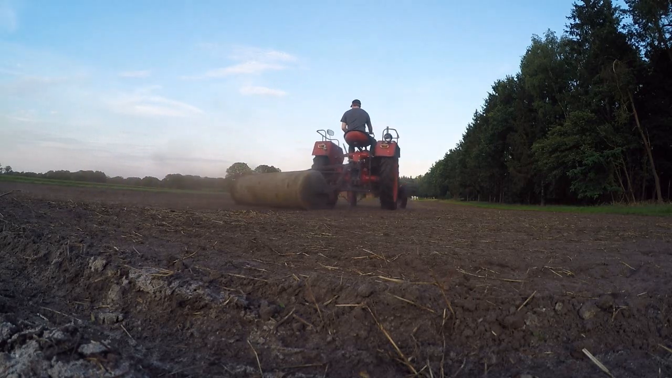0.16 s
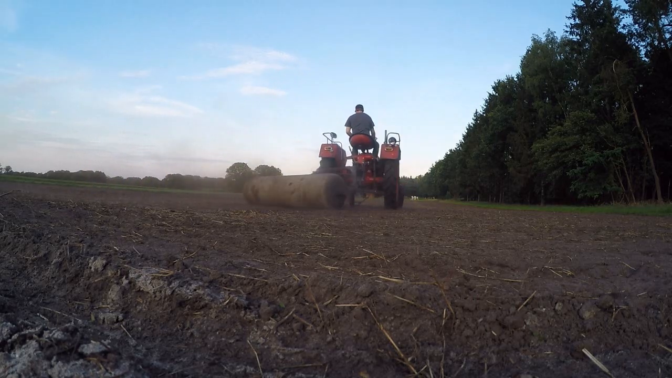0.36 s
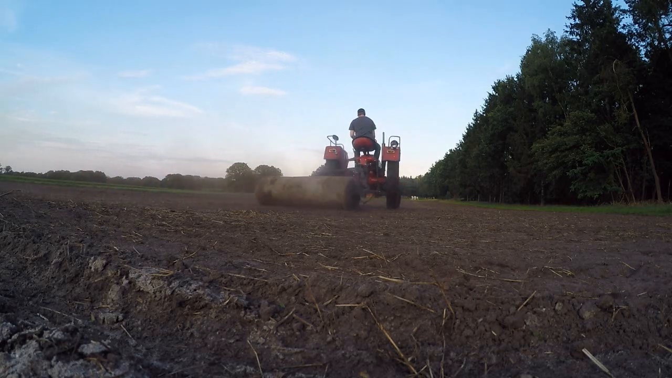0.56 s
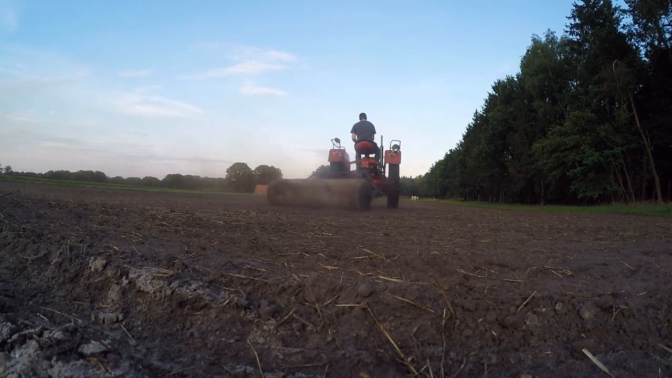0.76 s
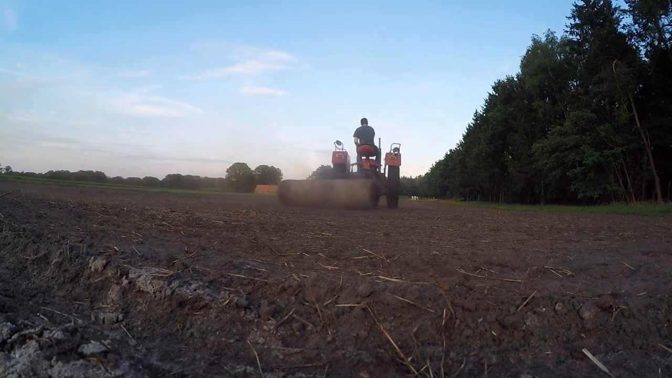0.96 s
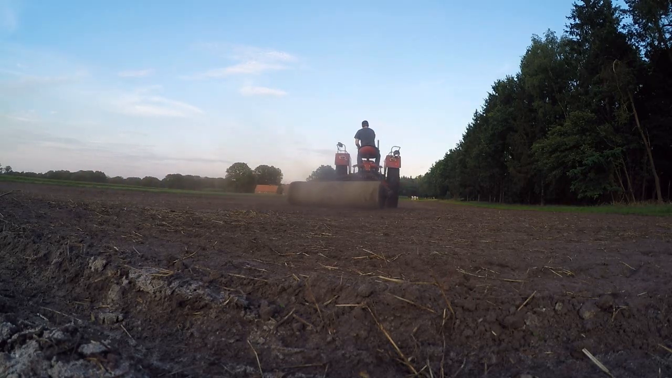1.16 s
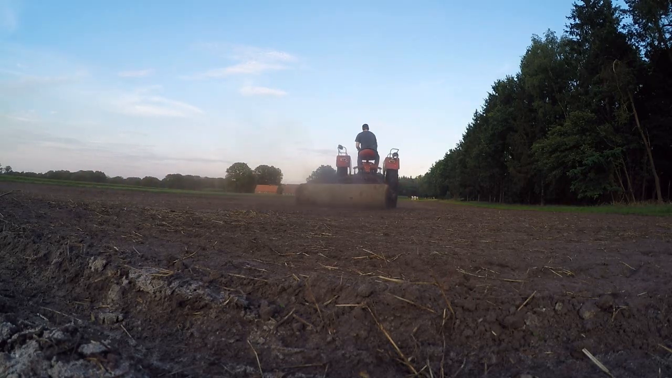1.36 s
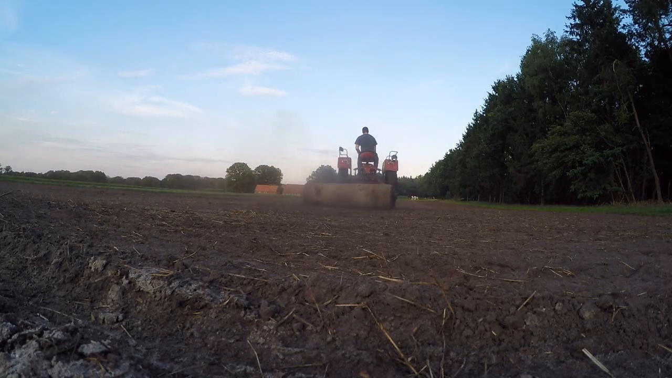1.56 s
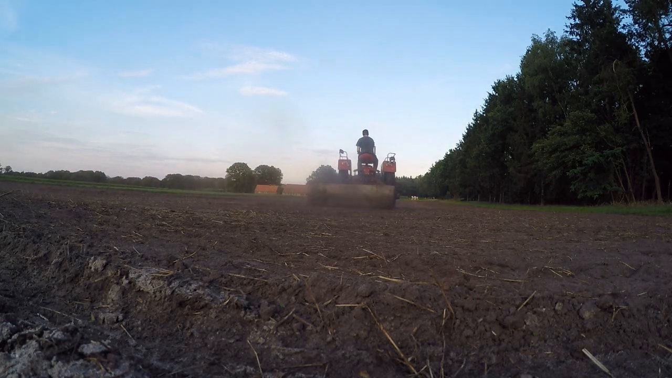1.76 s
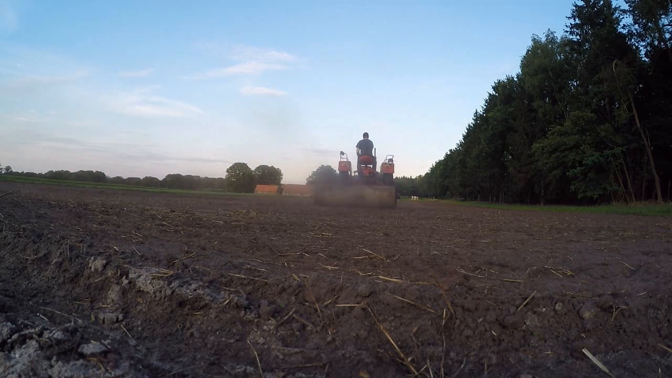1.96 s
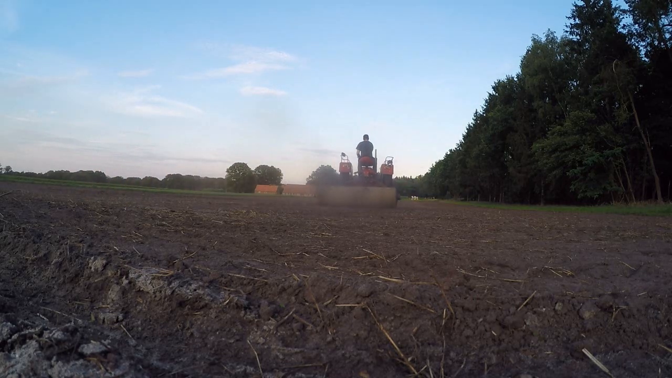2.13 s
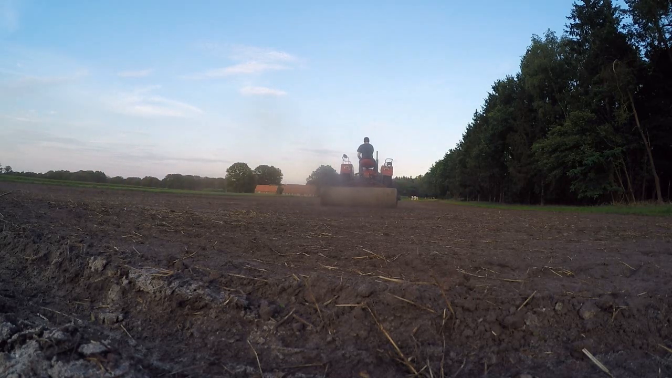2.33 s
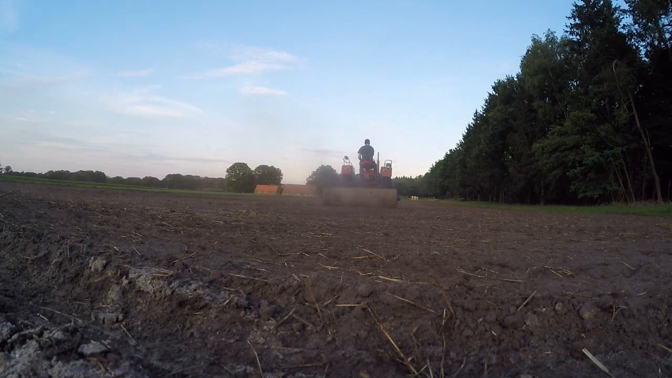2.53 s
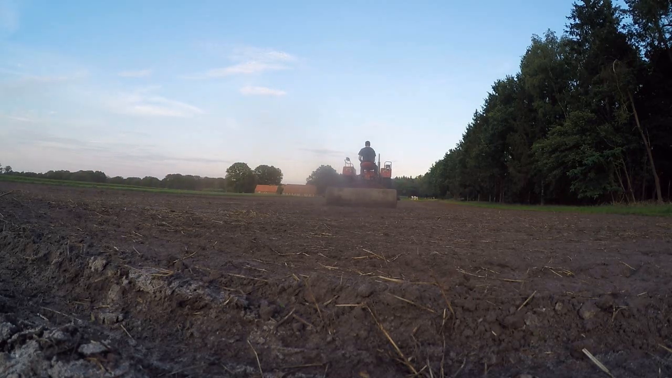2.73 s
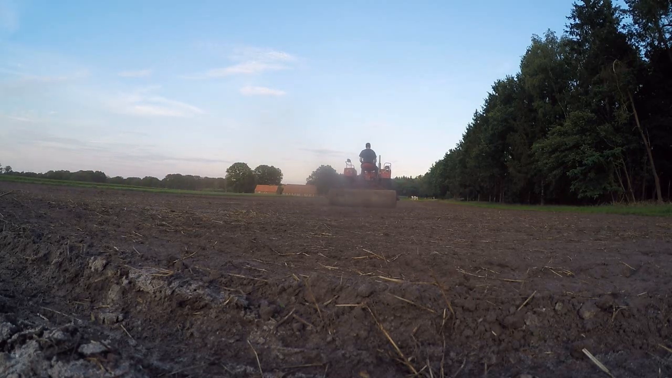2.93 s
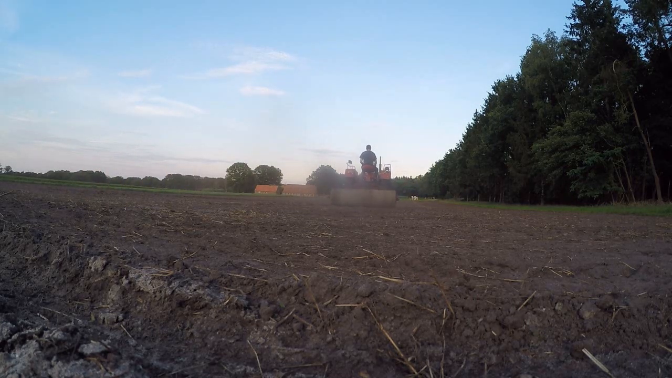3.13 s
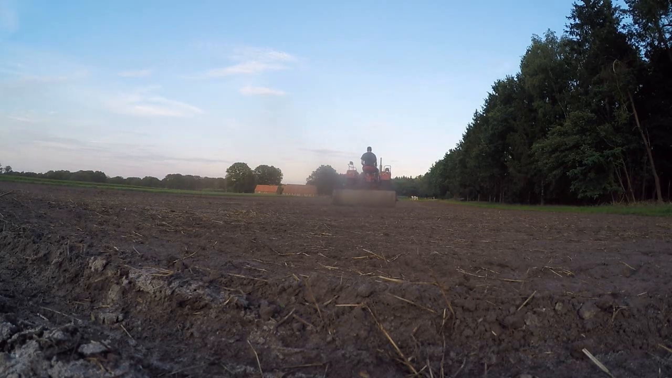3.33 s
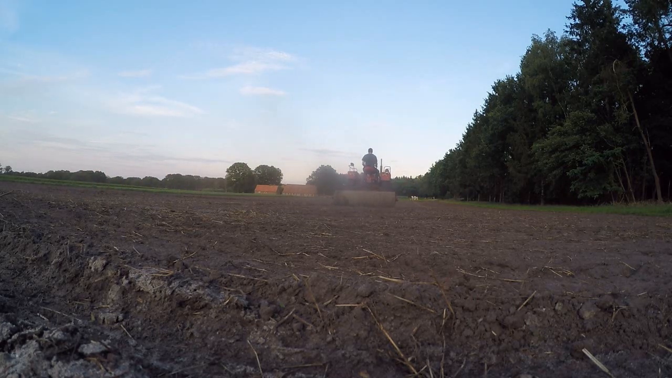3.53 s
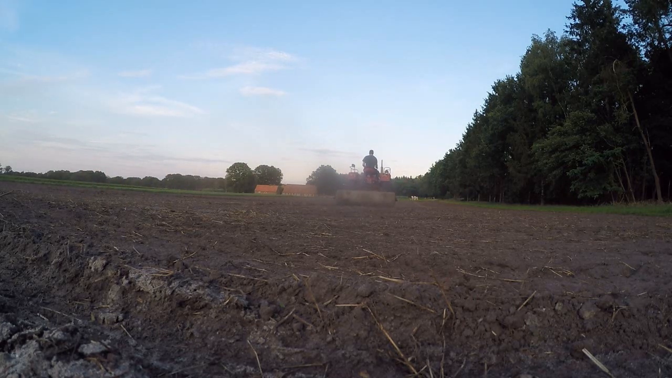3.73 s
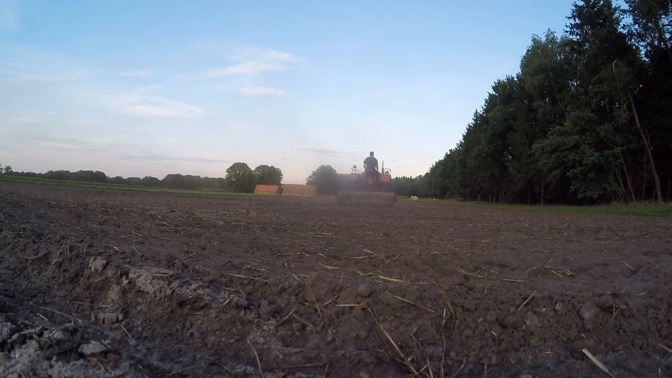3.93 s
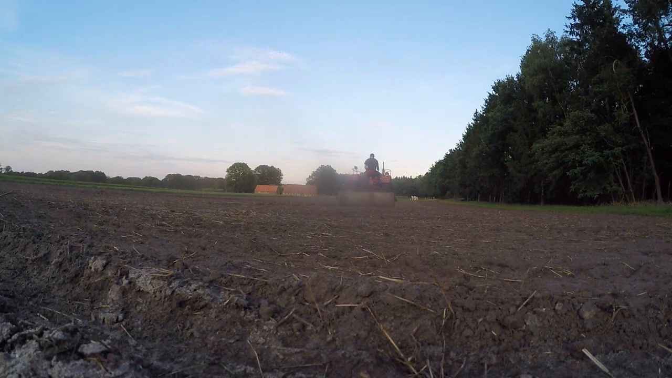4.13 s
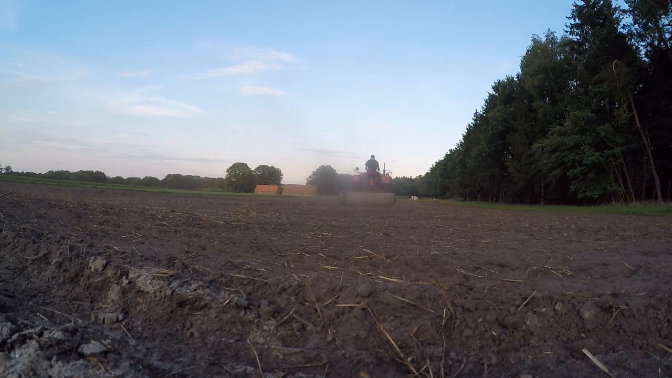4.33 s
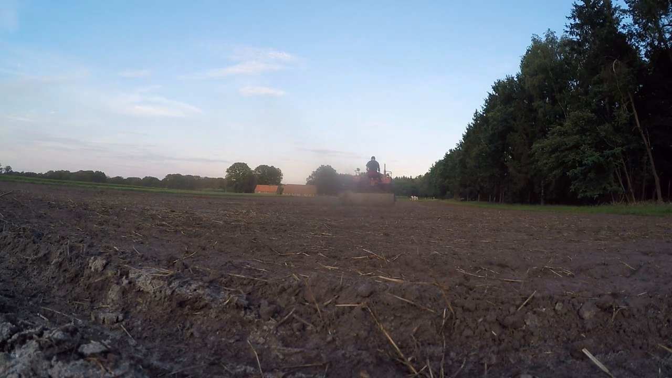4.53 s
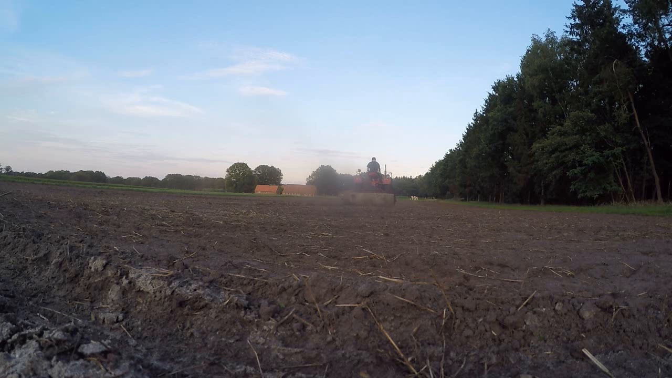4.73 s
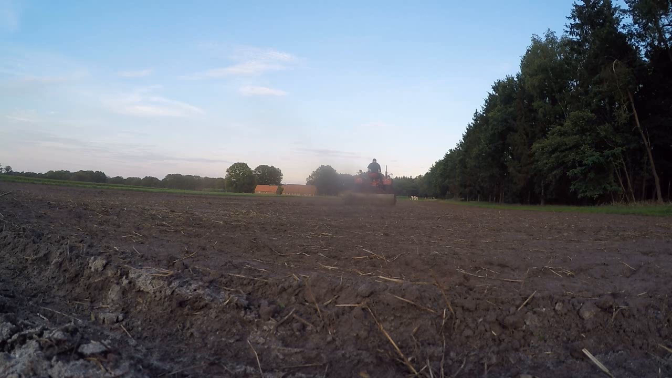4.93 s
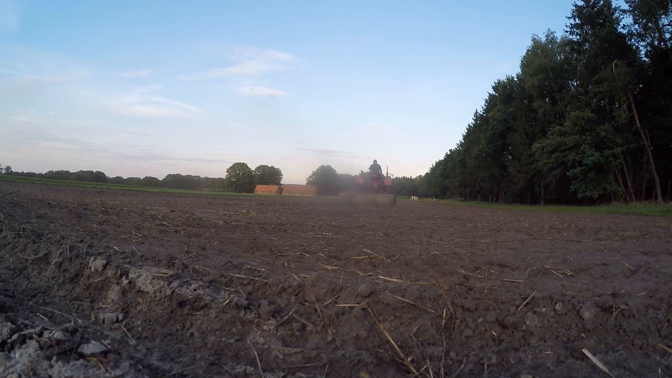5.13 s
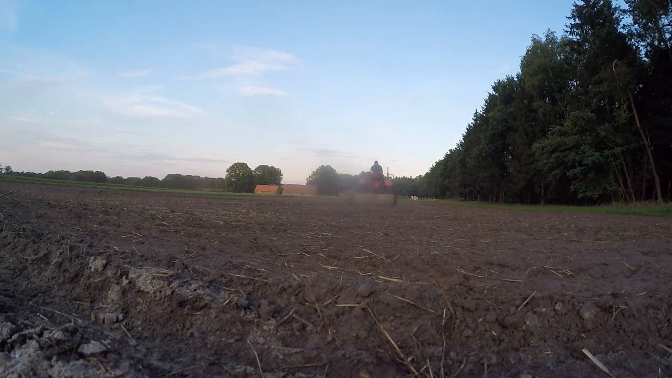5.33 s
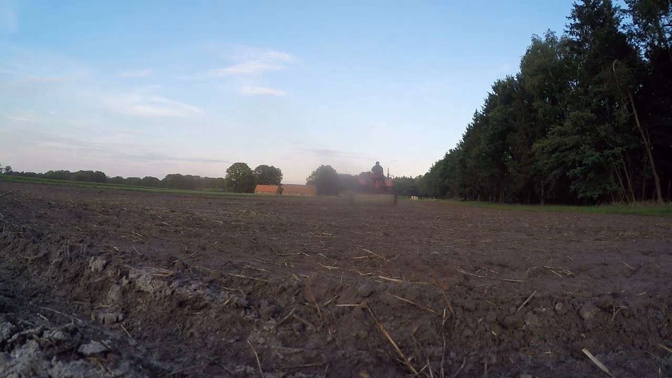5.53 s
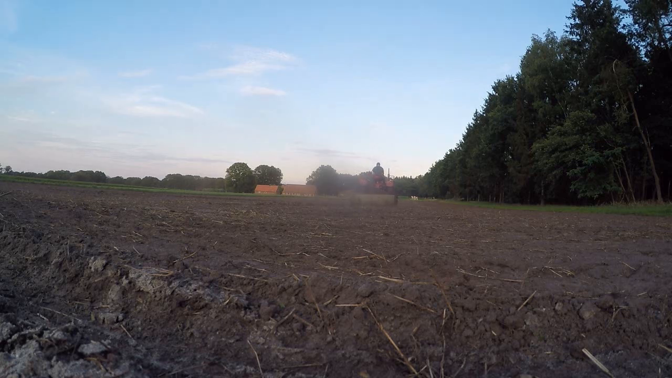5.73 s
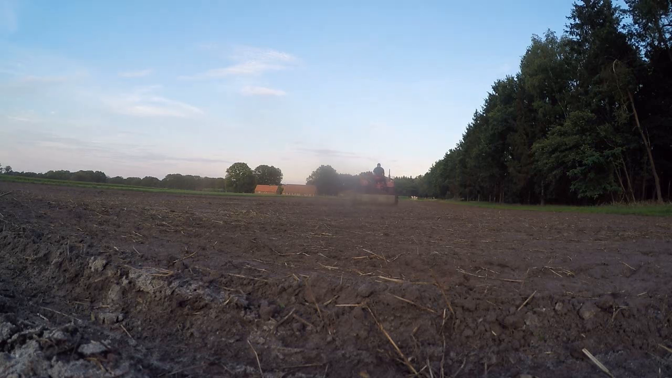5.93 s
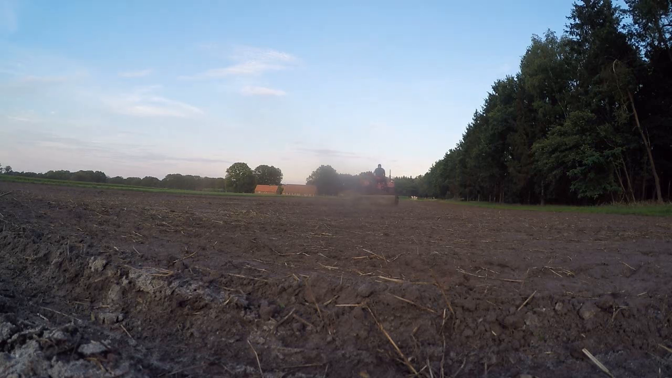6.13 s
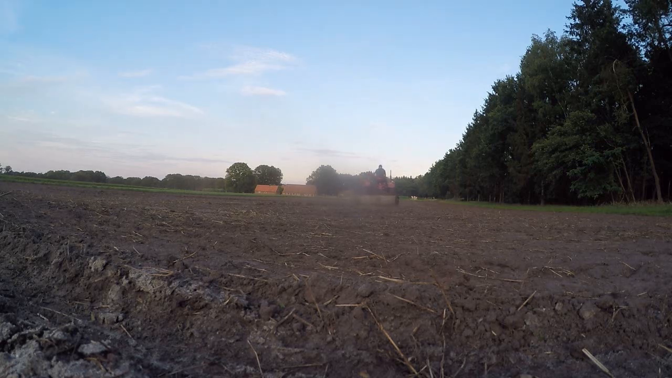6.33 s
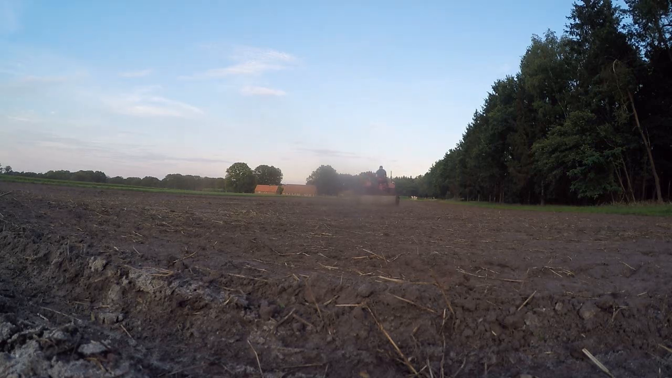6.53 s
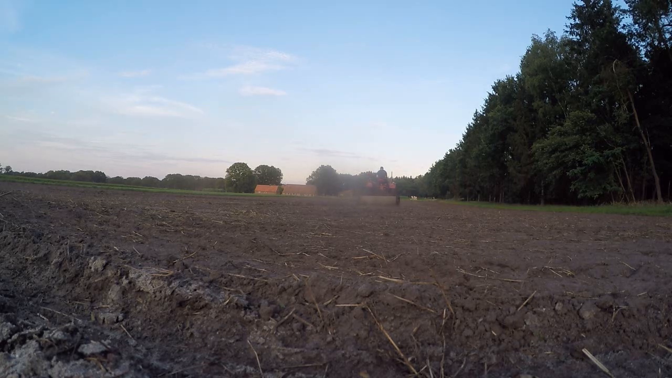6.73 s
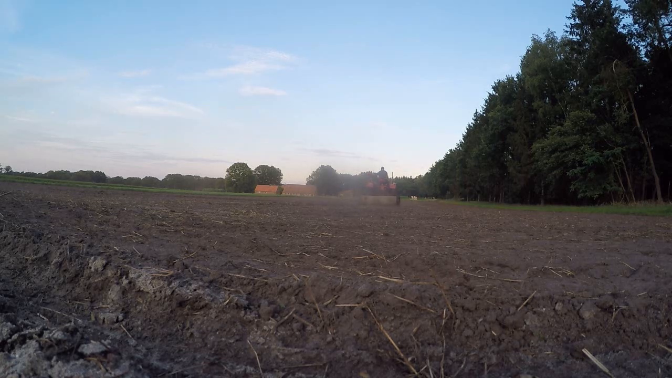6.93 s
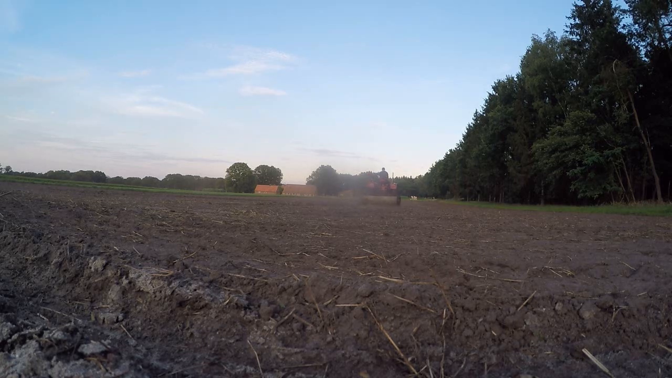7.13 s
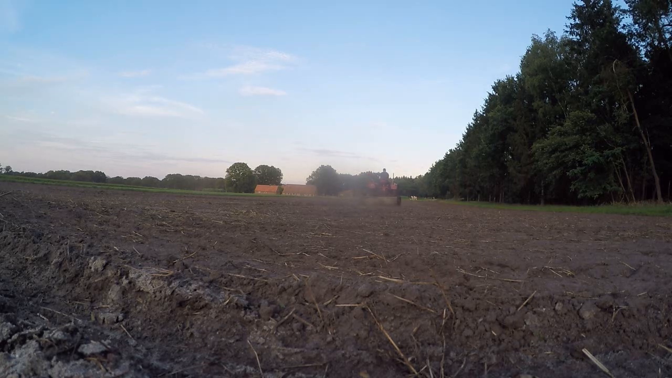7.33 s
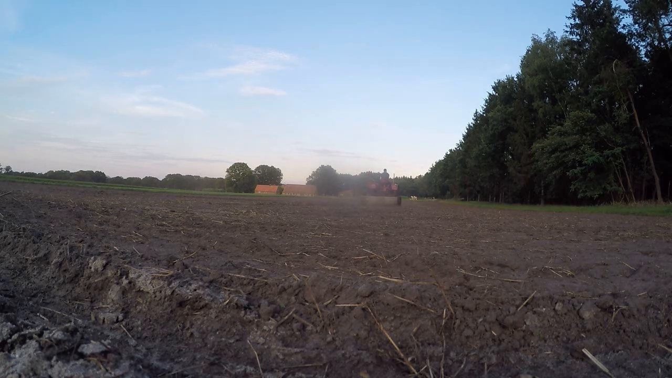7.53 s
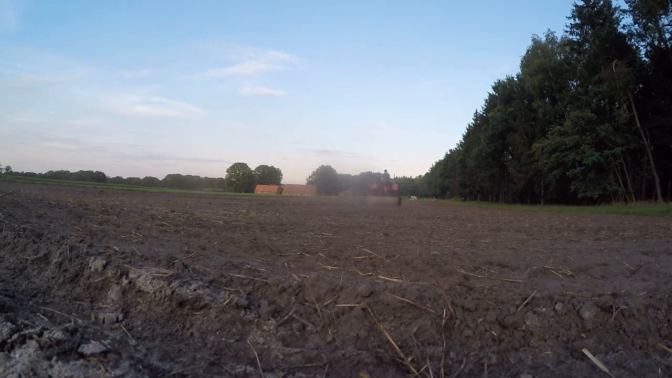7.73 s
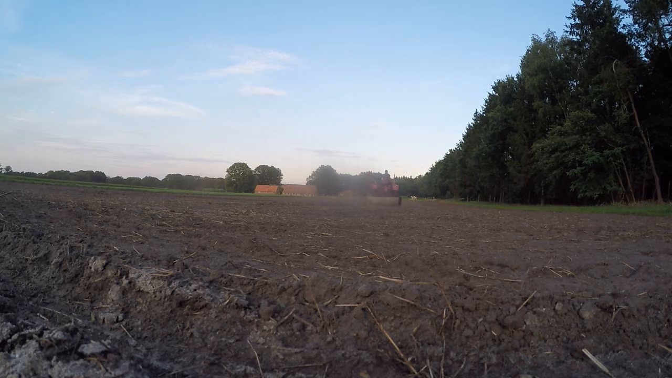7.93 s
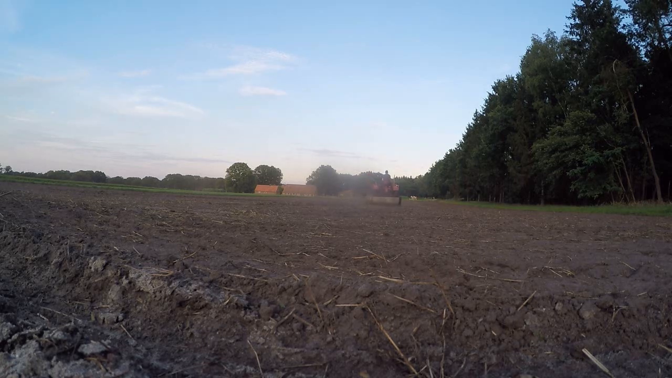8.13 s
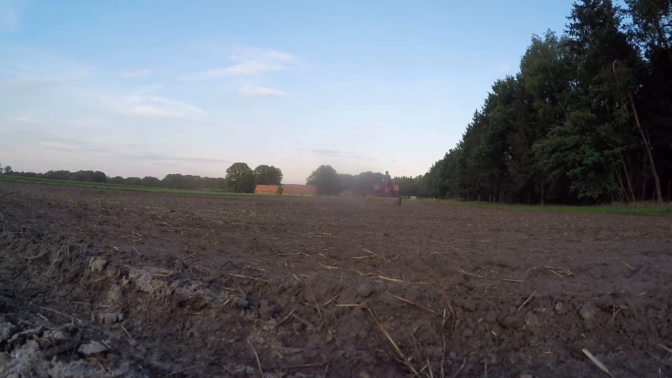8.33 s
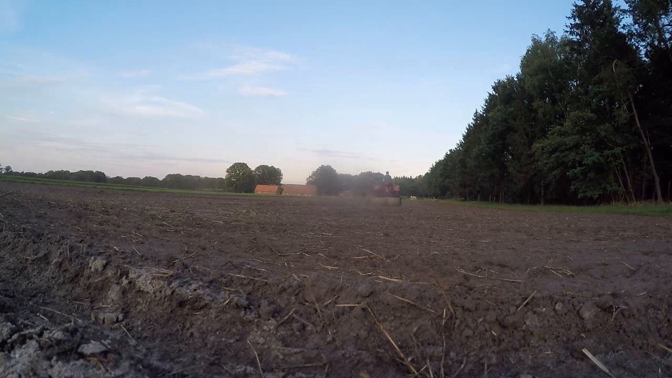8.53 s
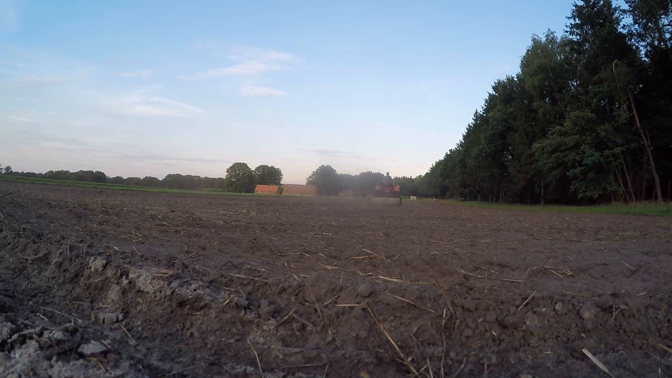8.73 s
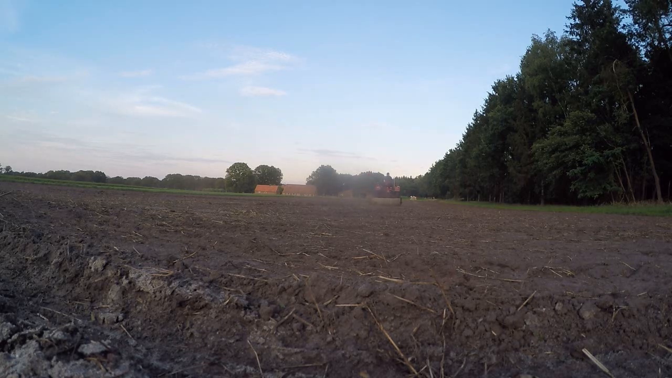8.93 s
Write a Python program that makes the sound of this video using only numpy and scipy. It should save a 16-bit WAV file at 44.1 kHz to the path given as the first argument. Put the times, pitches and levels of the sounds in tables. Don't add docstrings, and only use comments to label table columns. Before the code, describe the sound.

Outdoors at a field's edge, a fixed low microphone hears stubble and clods crunch close by at the start, then an old two-cylinder tractor driving away. Its deep, lopsided exhaust thumps run steadily under metallic clatter, valve hiss and knocking, with a roller rumbling behind. The engine dulls slightly as the roller swings past, then everything gradually gets quieter; a faint hitch squeak comes late.

```python
import sys
import numpy as np
from scipy import signal
from scipy.io import wavfile
from scipy.ndimage import uniform_filter1d

SR = 44100
rng = np.random.default_rng(int(sys.argv[2]) if len(sys.argv) > 2 else 0)


def put_to_file(sound):
    columns = np.atleast_2d(sound).T
    safe = np.clip(columns, -1, 1)
    whole_steps = np.round(safe * 32767)
    wavfile.write(sys.argv[1], SR, whole_steps.astype(np.int16))


def makeup_ratio(level_db):
    decades = np.asarray(level_db, float) / 20
    return 10 ** decades


N = 395577
RUN_IN = 24000
TIME = np.arange(-RUN_IN, N) / SR


def rms_one(x):
    return x / np.sqrt(np.mean(x ** 2) + 1e-20)


def curve(rows):
    s, value = np.transpose(rows)
    return np.interp(TIME, s, value)


def drift(rate):
    r = np.exp(-80 * np.pi * rate / SR)
    chance = rng.standard_normal(len(TIME) // 40 + 2002)
    slow = signal.lfilter([1], [1, -2 * r, r * r], chance)[2000:]
    return np.interp(np.arange(len(TIME)) / 40, np.arange(len(slow)), rms_one(slow))


def ring(x, hz, t60):
    r, w = makeup_ratio(-60 / (t60 * SR)), 2 * np.pi * hz / SR
    return signal.lfilter([0, np.sin(w)], [1, -2 * r * np.cos(w), r * r], x + 1e-18)


def resonant_noise(white, hz, t60):
    return rms_one(ring(ring(white, hz, t60), hz, t60))


def fade(x, t60):
    return signal.lfilter([1], [1, -makeup_ratio(-60 / (t60 * SR))], x + 1e-18)


def receding(start_db, spreading, db_per_10m):
    start_m, drive_m_per_s = 5.85, 4.22
    metres = start_m + drive_m_per_s * np.maximum(TIME, 0)
    return start_db - spreading * 20 * np.log10(metres / start_m) - db_per_10m * (metres - start_m) / 10


# (t/s, level/dB, f/Hz,
# width/Hz, t60/s)
JOLT_BURSTS = [
    (-.1, -62, 12600, 7000, 9.2),
    (.012, -28, 480, 600, 0.3),
    (.04, -27, 1200, 2400, 0.076),
    (.105, -34, 420, 400, .2),
    (.105, -36, 2000, 2000, .08),
    (1.402, -28.5, 2310, 3500, 0.13),
    (6.675, -55.5, 6530, 40, 0.5),
    (6.675, -60, 6940, 40, .4),
]


def jolts():
    out, white = 0, rng.standard_normal(len(TIME))
    for s, db, hz, width, t60 in JOLT_BURSTS:
        since = np.maximum(TIME - s, 0)
        rise = 1 - np.exp(-since / 0.0065)
        fall = makeup_ratio(-60 * np.minimum(since / t60, 3))
        out = out + makeup_ratio(db) * rise * fall * resonant_noise(white, hz, 2.2 / width)
    return out


# (t/s, four-stroke cycles per s)
ENGINE_SPEED = [(0, 11.375), (.5, 11.386), (1.6, 11.657), (2.1, 11.443), (2.9, 11.688), (4.4, 11.453),
                (4.7, 11.268), (6.1, 11.057), (6.7, 11.11), (7.0, 11.026), (8.3, 11.085), (8.6, 11.246),
                (8.97, 11.199)]


def each_cycle(share, spread_db, jitter_s):
    start_cycle = -.159
    turned = np.cumsum(curve(ENGINE_SPEED)[::64]) * 64 / SR
    cycles = start_cycle + turned - np.interp(0, TIME[::64], turned)
    chance = rng.standard_normal((110, 2))
    at = np.interp(np.arange(-5, 105) + share, cycles, TIME[::64], right=99)
    at = at + jitter_s * chance[:, 0]
    index = np.round(at * SR).astype(int) + RUN_IN
    inside = index < len(TIME)
    clicks = np.zeros(len(TIME))
    clicks[index[inside]] = makeup_ratio(spread_db * chance[inside, 1])
    return clicks


# (share of cycle, level/dB)
FIRING_STROKES = [
    (-.004, 0),
    (.236, -2.5),
]
# (f/Hz, level/dB, t60/s, polarity)
PIPE_MODES = [(39.3, -12.7, 0.35, -1), (57.4, 1.2, 0.052, 1), (62.7, -10.4, 0.139, -1),
              (86.8, -11.0, 0.122, -1), (114.3, -32.0, 0.5, -1), (170.8, -28.7, 0.099, 1)]
# (share of cycle, level/dB)
INTAKE_STROKES = [
    (.315, 0),
    (.829, .1),
]
# (f/Hz, level/dB, t60/s, polarity)
INTAKE_MODES = [(64.4, -36.6, 0.5, 1), (102.5, -34.8, 0.5, 1), (120.0, -33.9, 0.5, 1),
                (155.1, -53.7, 0.5, 1), (172.7, -29.7, 0.259, -1)]


def exhaust():
    puff_hz, mic_cut_hz = 164.6, 43.4
    boom = 0
    for strokes, modes in (FIRING_STROKES, PIPE_MODES), (INTAKE_STROKES, INTAKE_MODES):
        puffs = sum(makeup_ratio(db) * each_cycle(share, spread_db=.3, jitter_s=.00005) for share, db in strokes)
        for hz, db, t60, sign in modes:
            boom = boom + sign * makeup_ratio(db) * ring(puffs, hz, t60)
    r = np.exp(-2 * np.pi * puff_hz / SR)
    soft = signal.lfilter([1], [1, -2 * r, r * r], boom)
    return rms_one(signal.sosfilt(signal.butter(2, mic_cut_hz, "high", fs=SR, output="sos"), soft))


# (share of cycle, centre f/Hz, width/octaves, level over the clatter/dB, t60/s)
VALVE_EVENTS = [(0.805, 4930, 0.44, 6, 0.071), (0.858, 9200, 0.74, 7, 0.051),
                (0.065, 6150, 0.82, 7.5, 0.065), (0.31, 9500, 0.47, 3.5, 0.056),
                (0.544, 10800, 0.88, 9, 0.06), (0.283, 400, 0.84, -2.5, 0.064),
                (0.59, 3740, 0.19, 5, 0.057), (.1, 15000, .4, 1, .06), (0.83, 13700, 0.38, -1, 0.054),
                (0.25, 5600, 0.63, -3, 0.042), (.84, 1600, 0.51, 1, 0.054), (0.596, 2410, 0.19, 0, 0.064)]


def valve_puffs():
    puffs = []
    for share, _, _, db, t60 in VALVE_EVENTS:
        clicks = makeup_ratio(db) * each_cycle(share, spread_db=0.0, jitter_s=.001)
        puffs.append(uniform_filter1d(fade(clicks, t60), size=90))
    return puffs


def bands(spectrum, puffs, patchy_db):
    hz_points, db_points = np.transpose(spectrum)
    octaves = np.log2(hz_points[-1] / hz_points[0])
    edges = hz_points[0] * 2 ** np.arange(0, octaves + .3, 1 / 3)
    white, out = rng.standard_normal((2, len(TIME))), 0
    for k, (low, high) in enumerate(zip(edges, edges[1:])):
        hz = np.sqrt(low * high)
        swell = 1
        for puff, (_, centre, width, *_) in zip(puffs, VALVE_EVENTS):
            away = np.log2(hz / centre)
            if abs(away) < 2 * width:
                swell = swell + puff * np.exp(-(away / width) ** 2)
        band = signal.butter(2, [low, high], "band", fs=SR, output="sos")
        noise = signal.sosfilt(band, white[k % 2])
        level_db = np.interp(np.log(hz), np.log(hz_points), db_points) + patchy_db * drift(9.1)
        out = out + noise * swell * makeup_ratio(level_db)
    return rms_one(out)


# (f/Hz, level per Hz/dB)
CLATTER_SPECTRUM = [(410, -32), (700, -3), (804, 0.5), (1140, -4.5), (1280, 9), (1430, -0.5), (1760, 1),
                    (2150, -3.5), (2950, -2), (3160, -4), (3420, -4.5), (4750, -6), (7500, -27),
                    (9750, -53), (16500, -120)]


def clatter(puffs):
    return bands(CLATTER_SPECTRUM, puffs, patchy_db=0.14)


# (share of cycle, f/Hz, level/dB, t60/s)
STRUCK_METAL = [(.05, 1750, 8, 0.049), (.13, 1770, 3, 0.045), (.08, 3200, 6, 0.097), (.07, 4450, -1, 0.055),
                (.09, 6200, -8, 0.038), (.1, 2690, 4.5, 0.042), (.82, 4900, -5, 0.071),
                (.84, 4150, -3, 0.076), (.84, 5520, -6.5, 0.14), (.86, 2680, 1.5, 0.039),
                (.84, 9300, -19.5, 0.026), (.55, 7600, -18, .04), (.76, 9600, -27, 0.04)]


def knock(block_db, view_db, top_db):
    out = 0
    for share, hz, db, t60 in STRUCK_METAL:
        blows = each_cycle(share, spread_db=1.5, jitter_s=.0008)
        blows -= .35 * each_cycle(share + .035, spread_db=3, jitter_s=.001)
        level_db = db + .7 * drift(.7)
        if hz < 2000:
            level_db = level_db + block_db
        elif hz > 7000:
            level_db = level_db + top_db
        elif hz > 3500:
            level_db = level_db + view_db
        soft = ring(blows, hz, t60=0.0066) * hz / 90000
        out = out + makeup_ratio(level_db) * (ring(soft, hz - 15, t60) + .6 * ring(soft, hz + 25, t60))
    return out


# (f/Hz, width/Hz, level/dB)
PANEL_MODES = [(457.6, 59, -9.5), (604.3, 28, -13.5), (810.4, 40, -14), (1300, 48, -14.5),
               (2670, 94, -19.5), (3180, 54, -17.5), (400, 21, -16), (2900, 23, -23.5)]


def panels():
    white = rng.standard_normal(len(TIME))
    return sum(makeup_ratio(db + 1.0 * drift(0.37)) * resonant_noise(white, hz, 2.2 / width)
               for hz, width, db in PANEL_MODES)


# (f/Hz, level per Hz/dB)
ROLLER_SPECTRUM = [(30, 8), (60, -10), (120, 2), (180, -0.5), (240, 0), (330, -2.5), (460, -2), (550, -9.5),
                   (810, -8.5), (1000, -16.5), (1400, -20.5)]


def roller(puffs):
    return bands(ROLLER_SPECTRUM, puffs, patchy_db=0.78)


# (f/Hz, level per Hz/dB)
HISS_SPECTRUM = [(3530, -16), (6000, 1), (6660, -3), (8100, -7), (9050, -6.5), (10700, -15), (13300, -18),
                 (15000, -20)]


def hiss(puffs):
    return bands(HISS_SPECTRUM, puffs, patchy_db=0.9)


def air():
    band = signal.butter(2, [11500, 14800], "band", fs=SR, output="sos")
    return rms_one(signal.sosfilt(band, rng.standard_normal(len(TIME))))


# (start t/s, length/s, level/dB)
WHINE_SWELLS = [
    (1.75, .3, -55),
    (3.4, 0.3, -50.5),
    (4.75, 0.39, -52),
    (5.552, 0.29, -47),
    (5.9, 0.64, -53),
    (6.78, .25, -49),
    (7.303, 0.4, -49.5),
    (7.9, 0.49, -57),
]


def whine():
    whine_hz, idle_db, edge_s = 322.2, -59, 0.17
    gain = makeup_ratio(idle_db)
    for s, length, db in WHINE_SWELLS:
        from_edge = np.minimum(TIME - s, s + length - TIME)
        gain = gain + makeup_ratio(db) * np.clip(from_edge / edge_s + .5, 0, 1)
    hz = whine_hz + 2.42 * drift(2.124)
    return gain * makeup_ratio(1.3 * drift(12)) * np.sin(2 * np.pi * np.cumsum(hz) / SR)


def cricket():
    start_s = 2.7
    song = resonant_noise(rng.standard_normal(len(TIME)), hz=8755, t60=.04)
    return song * np.clip((TIME - start_s) / .4, 0, 1) * makeup_ratio(2.5 * drift(3))


# (t/s, level of shade/dB)
ROLLER_SHADE = [
    (0, -0.5),
    (.7, -1.5),
    (1.2, -5.5),
    (1.6, -6.5),
    (2.3, -3.5),
    (3.1, -2.5),
    (4.2, -1),
    (5.1, 0),
    (7.2, .3),
    (8.97, -1),
]
# (t/s, level/dB)
ENGINE_LOAD = [(0, 4), (.4, -2.5), (.75, 4.5), (1.2, 2.5), (1.5, -4), (2.1, -1.5), (2.7, 4), (3.5, 1.5),
               (4.4, -0.5), (5.1, -2), (5.5, 0), (6, -1.5), (7.1, 1), (7.5, -3), (7.9, 1), (8.4, 2),
               (8.97, -4)]
# (t/s, level of puffs and bright ticks/dB)
VALVE_GEAR_VIEW = [
    (0, -1),
    (.9, 0),
    (1.6, 1.5),
    (3, 1.5),
    (4.2, -0.5),
    (5.5, -1),
    (7, -4.5),
    (8.97, -3),
]


def scene():
    shade_db, load_db, view_db = curve(ROLLER_SHADE), curve(ENGINE_LOAD), curve(VALVE_GEAR_VIEW)
    speed = curve(ENGINE_SPEED)
    extra_speed = uniform_filter1d(speed - speed.min(), size=SR // 2)
    exhaust_db = receding(-17, spreading=0.27, db_per_10m=0.89) + .05 * load_db + 3 * extra_speed
    roller_db = receding(-32.5, spreading=0.97, db_per_10m=0.27)
    clatter_db = receding(-36, spreading=0.76, db_per_10m=0.29) + 0.2 * shade_db
    hiss_db = receding(-57, spreading=0.34, db_per_10m=.1) + shade_db
    block_db = receding(-46, spreading=0.61, db_per_10m=1.18) + load_db

    puffs = [makeup_ratio(view_db + 0.5) * puff for puff in valve_puffs()]
    knock_db = 1.33 * (block_db - clatter_db + 13.0)
    top_db = 1.4 * (hiss_db - clatter_db + 16.5)
    ticks = rms_one(knock(knock_db, view_db, top_db))
    engine = makeup_ratio(-1.0) * clatter(puffs) + makeup_ratio(-7.5) * ticks + panels()

    mix = jolts() + makeup_ratio(exhaust_db) * exhaust() + makeup_ratio(clatter_db) * engine
    mix += makeup_ratio(roller_db + 1.5) * roller(puffs)
    mix += makeup_ratio(hiss_db + 4.0) * hiss(puffs)
    mix += makeup_ratio(-84) * air() + whine() + makeup_ratio(-77.5) * cricket()
    return mix[None, RUN_IN:]


def low_pass(x):
    return signal.sosfilt(signal.butter(12, 15190, fs=SR, output="sos"), x)


def record(dry):
    return low_pass(dry)


dry = scene()
out = record(dry)
put_to_file(out)
```